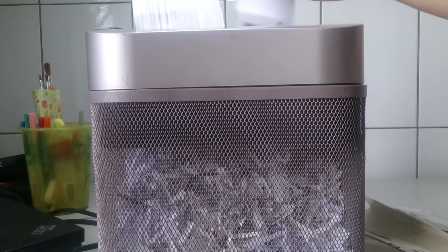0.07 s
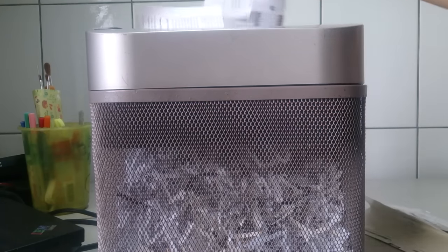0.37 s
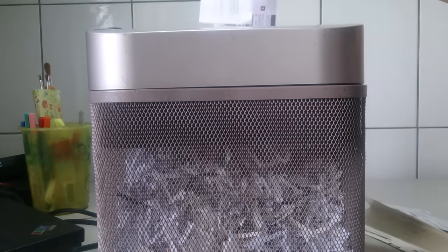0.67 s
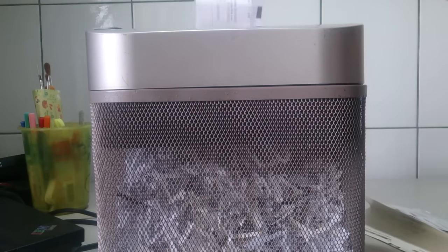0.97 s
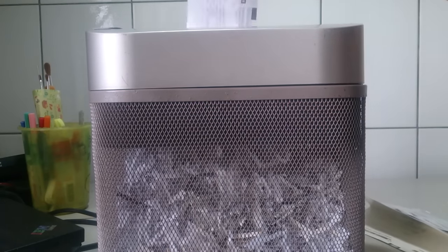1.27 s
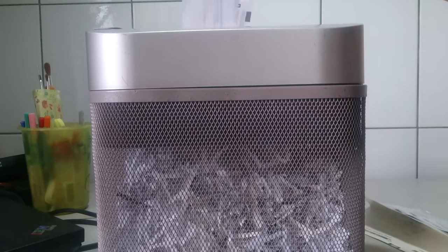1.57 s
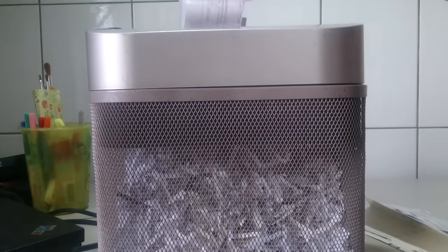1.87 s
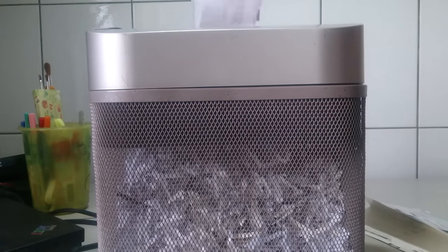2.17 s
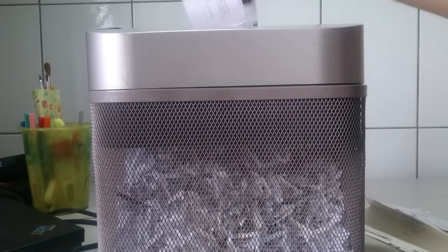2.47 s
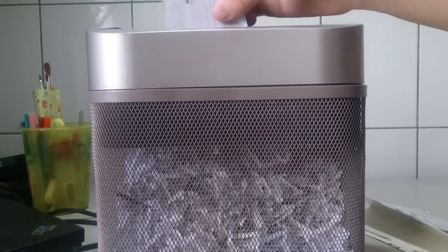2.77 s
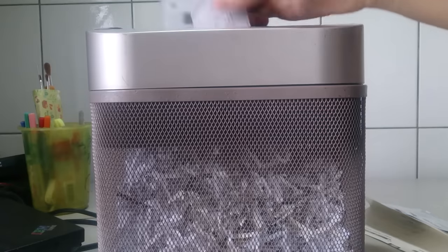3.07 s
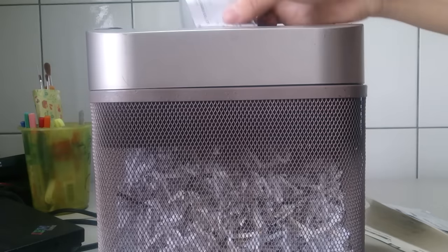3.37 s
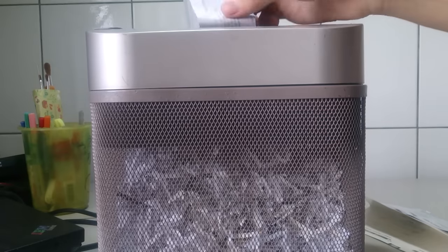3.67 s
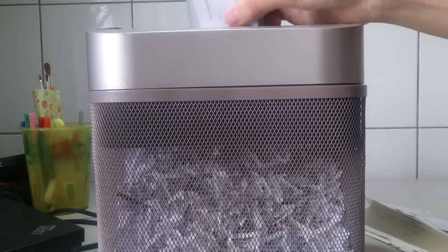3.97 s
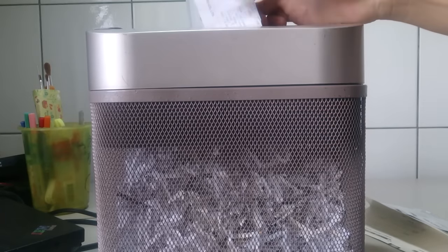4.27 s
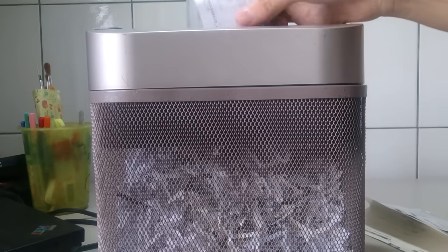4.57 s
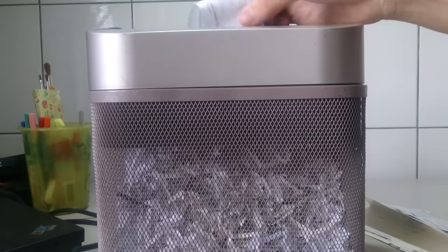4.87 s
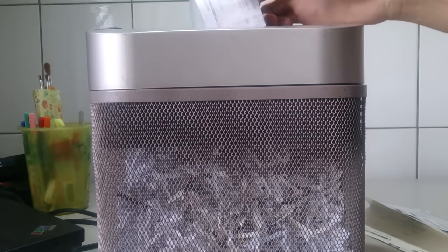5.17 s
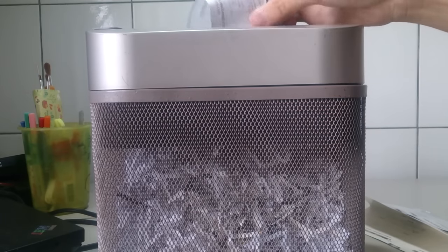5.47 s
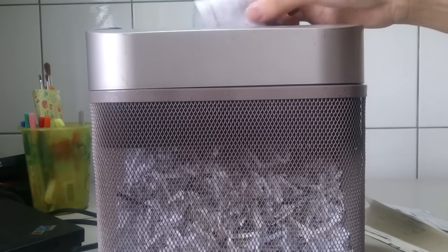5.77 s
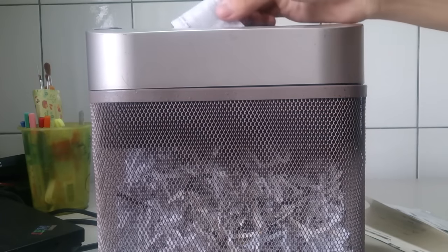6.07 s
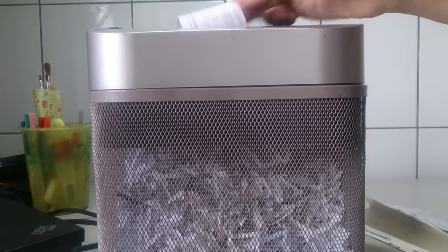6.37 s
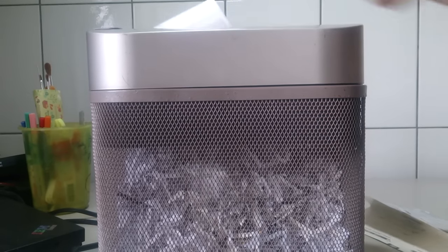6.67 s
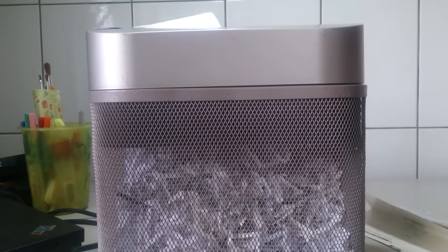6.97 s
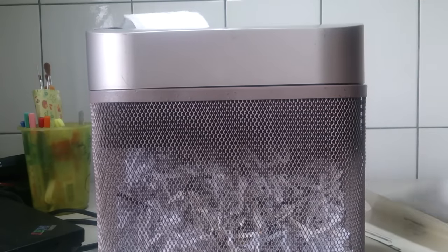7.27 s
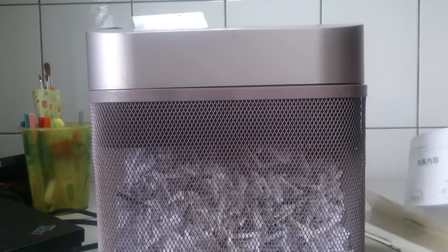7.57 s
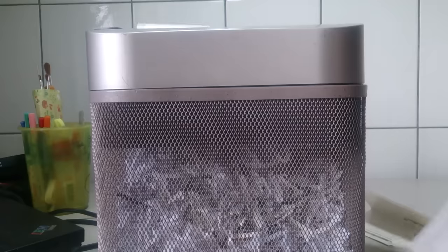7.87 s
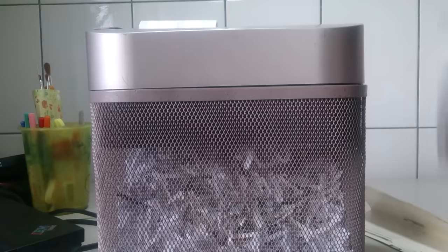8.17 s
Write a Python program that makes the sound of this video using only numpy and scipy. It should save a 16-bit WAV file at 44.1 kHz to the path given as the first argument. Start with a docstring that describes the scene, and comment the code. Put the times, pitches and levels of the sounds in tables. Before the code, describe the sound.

Close up in a tiled corner, paper tears and crackles loudly in a desktop shredder, the motor's whir sagging under the load. The machine coasts to a halt, leaving about four seconds of soft paper sliding, dry crinkles and light knocks on the plastic lid. Then it clicks on, spins up quickly and grinds through the paper again, with brief, very high squeals near the end.

```python
"""Paper crunches and snaps in the steel cutters of a small shredder, on a desk in a tiled corner.
Its gears whine and chatter in the plastic head, sagging in speed under load, over a mains hum.
The motor coasts to a stop; in the pause a hand works the sheet, which rustles and knocks in the slot.
Then the switch clicks, the gears jolt to life and the cutting goes on, with a few high squeaks."""
import sys
import numpy as np
from scipy import signal
from scipy.fft import rfft, irfft
from scipy.io import wavfile
from scipy.ndimage import uniform_filter1d

SR = 44100
rng = np.random.default_rng(int(sys.argv[2]) if len(sys.argv) > 2 else 0)


def wrap_up_sound(samples):
    """Save the sound to the file named by the first command line argument, as 16-bit audio."""
    columns = np.atleast_2d(samples).T
    # keep every value between -1 and 1, then stretch to whole-number steps
    tamed = np.clip(columns, -1, 1)
    steps = np.round(tamed * 32767).astype(np.int16)
    wavfile.write(sys.argv[1], SR, steps)


N = 362061
TIME = np.arange(N) / SR
POWER_OFF_S, POWER_ON_S = 2.26, 6.27  # the motor is unpowered between these

# modes of the plastic head: f/Hz, width/Hz, level/dB
HEAD_MODES = [(218, 65, -17.5), (397, 17, 0.5), (456.6, 12.2, 3.5), (546, 22, -9.5), (681, 27, -7),
              (927, 93, -0.5), (1156, 330, -12.5), (1690, 43, -7), (1940, 400, -13.5), (2960, 2600, -22.5)]
# rings of the slot and mesh basket: f/Hz, width/Hz, level/dB
SLOT_MODES = [(6105, 50, 16), (11420, 50, 14.5)]
# tone of dry, handled paper: f/Hz, level/dB
PAPER_EQ = [(100, 1.5), (500, 3), (2000, -4), (4000, 3.5), (7000, 1), (9000, 2.5), (12000, -0.5),
            (15500, -2.5)]


def cutting(speed):
    """Fibres tear in quick crunches that follow the cutters' speed, with a loud snap now and then."""
    # sharp snaps: paper between the cutters, and the switch clicking on at 6.27 s: t/s, level/dB
    snap_hits = [(0.021, -7.5), (0.271, -5.5), (0.39, -14), (0.419, -9.5), (0.536, -5), (0.634, -7.5),
                 (0.741, -9), (0.774, -6), (0.855, -8), (0.999, -8), (1.015, -7.5), (1.091, -11.5),
                 (1.158, -11), (1.565, -3.5), (1.593, -6.5), (1.733, -11.5), (2.01, -7.5), (2.236, -10),
                 (6.2706, -20), (6.459, -9), (6.669, -16), (6.803, -8), (6.831, -7), (6.941, -16),
                 (8.081, -7)]
    # tone of the tearing: f/Hz, level/dB
    tear_eq = [(100, -16), (400, 13.5), (1200, 3.5), (2500, 1), (4000, -1), (7000, -2.5), (8300, -1),
               (10000, -2.5), (13300, -4), (15500, -9)]
    # rings of the steel cutters: f/Hz, width/Hz, level/dB
    cutter_modes = [(3670, 47, -2), (9040, 42, -30), (13700, 200, -8)]
    bite = undb(-29.5 + 1.2 * walk(33)) * (speed / speed.max()) ** 1.32
    crunch = unit(clicks(4000, spread_db=3.5) * undb(1.22 * walk(180)))
    pops = undb(-10) * clicks(70, spread_db=3.5)
    tearing = room(undb(2) * bite * crunch, wet_db=15.5, t60_s=0.014, pan_db=3.5)
    tearing += room(bite * pops, wet_db=6, t60_s=0.012, pan_db=7)
    times, levels_db = np.transpose(snap_hits)
    snaps = room(bursts(times, levels_db - 8, decay_s=0.0023), wet_db=-2, t60_s=0.021, pan_db=8)
    tearing += highpass(snaps, hz=1510, order=1)  # thin and bright
    return tiles(colour(tearing, tear_eq) + ring(tearing, cutter_modes), echo_db=-6.5)


def wheel_speed():
    """Gear wheel turns per second: sagging under load, braked by friction, spinning up again."""
    # powered speed as the paper loads the wheel: t/s, speed/(turns per s)
    loaded_speed = [(.1, 24.4), (.33, 25.05), (.5, 23.3), (.65, 23.0), (.9, 23.05), (1.05, 24.3),
                    (1.22, 24.8), (1.42, 23.1), (1.6, 24.8), (1.76, 25.8), (2.26, 25.55), (6.72, 24.85),
                    (6.93, 24.0), (7.1, 24.45), (7.35, 24.15), (7.5, 24.5), (7.8, 23.3), (7.95, 23.9),
                    (8.21, 23)]
    coast_s, spin_up_s = .457, .104
    coast = np.clip(1 - (TIME - POWER_OFF_S) / coast_s, 0, 1) ** 1.3
    spin_up = 1 - np.exp(-np.maximum(TIME - POWER_ON_S, 0) / spin_up_s)
    return np.interp(TIME, *np.transpose(loaded_speed)) * (coast + spin_up)


def drive(speed):
    """Gear tones and tooth chatter shake the head; the off-centre wheel makes both throb once a turn."""
    # the bin booms when the rotor's second harmonic meets it: f/Hz, width/Hz, level/dB
    bin_mode = [(257, 14, -14.5)]
    high_spot_turns = np.where(TIME < POWER_ON_S, .27, -.06)
    turns = high_spot_turns + np.cumsum(speed * (1 + 0.0015 * walk(23.4))) / SR
    wobble = np.cos(2 * np.pi * turns)
    pace = speed / speed.max()
    free = np.clip(speed - 24.8, 0, 1)  # 1 when the cutters run nearly unloaded
    # strain rises while the rotor speeds up or brakes
    strain = np.minimum(uniform_filter1d(np.abs(np.gradient(speed)) * SR, size=2000) / 35, 1)
    starting = strain * (TIME > POWER_ON_S)
    gears = gear_tones(turns, pace, free, strain, starting)
    whine = pinion_whine(turns, speed, free, strain, starting)
    tooth_force = undb(2.3 * wobble + 2 * walk(25) - 2 * strain - starting - .7 * free) * pace ** 0.4
    teeth = clicks(45 * speed, spread_db=3.5) * tooth_force
    chatter = room(teeth, wet_db=2, t60_s=0.16, pan_db=-1.5)
    throb = undb(3.3 * (1 - free) * wobble)
    body = ring(undb(-6.5) * gears * throb + undb(14) * chatter, HEAD_MODES)
    leak = undb(-16) * gears  # straight out through the slot
    boom = ring(np.sin(2 * np.pi * 10 * turns), bin_mode)
    return (body + leak + whine + boom) * drive_gain()


def gear_tones(turns, pace, free, strain, starting):
    """The big wheel sings loudest under load; speed changes bring its main tone forward."""
    # tones of the big wheel: f/wheel speed, level/dB
    wheel_orders = [(35, -6), (36, -3), (37, -14), (39, 0), (40, 5), (41, -10), (43, -8), (50, -3)]
    main_tone = (strain - .4 * starting) * mesh(turns, [(40, 3)], slip=.2)
    chord = mesh(turns, wheel_orders, slip=.3 + .2 * free) * undb(-5 * strain)
    return ports(chord + main_tone, pan_db=2) * pace ** 2 * undb(-5 * free)


def pinion_whine(turns, speed, free, strain, starting):
    """The fast pinion judders under strain; from rest it rattles loosely and sings once seated."""
    # tones of the pinion: f/wheel speed, level/dB
    pinion_orders = [(77, -8), (79, -5), (80, 5), (120, -8), (160, -6)]
    # gearbox frame modes that the whine sweeps through: f/Hz, width/Hz, level/dB
    frame_modes = [(925, 60, 12.5), (1565, 100, 6), (1765, 65, 2), (1990, 190, -1.5)]
    seated_speed = 18  # turns per second
    loose = starting * np.clip((seated_speed - speed) / 3, 0, 1)
    pressure = undb((2.2 + 1.5 * strain) * walk(70) - 6.5 * loose + 2.5 * free)
    tones = mesh(turns, pinion_orders, slip=.5 + .35 * (.7 * strain + loose - .5 * free))
    pinion = ports(tones, pan_db=3) * (speed / speed.max()) ** 1.3 * pressure
    return undb(-9) * ring(pinion, frame_modes) + undb(-22 + 4 * strain) * pinion


def mesh(turns, orders, slip):
    """Meshing teeth: tones locked to the wheel, shaken together by `slip` radians of gear play."""
    play = slip * walk(110)
    tones = sum(undb(db + 0.72 * walk(5)) * np.cos(2 * np.pi * order * turns + play)
                for order, db in orders)
    return tones * undb(.9 * walk(10))


def drive_gain():
    """Nearly even level: slack gears rattle a touch more when coasting and jolt as power returns."""
    slack = np.clip((TIME - POWER_OFF_S) / 0.48, 0, 1) * (TIME < POWER_ON_S)
    jolt = swell(POWER_ON_S + .022, length_s=.05)
    return undb(-27 + 0.5 * walk(40) + 0.5 * slack + 14 * jolt)


def growl():
    """Now and then the head shudders near one of its two strongest modes."""
    # surges of the growl: middle/s, length/s, level/dB, f/Hz
    surges = [(0.19, 0.098, -31.5, 403.6), (0.415, 0.076, -31, 444), (0.628, 0.18, -29.5, 449),
              (0.836, 0.12, -29, 447.6), (1.558, 0.025, -25.5, 434), (2.028, 0.059, -26.5, 447),
              (2.225, 0.088, -28, 448), (6.64, 0.048, -23, 444), (6.795, 0.066, -30.5, 397.5),
              (7.273, 0.068, -27.5, 451)]
    judder, slip = undb(2 * walk(50)), 0.85 * walk(48)
    tones = sum(undb(db) * swell(middle, length) * np.sin(2 * np.pi * hz * TIME + slip)
                for middle, length, db, hz in surges)
    return ports(tones * judder, pan_db=-3.5)


def squeaks():
    """The sheet rubs on the blades in short, rough, very high squeals."""
    # rubs on the blades: middle/s, length/s, f/Hz, level/dB
    rubs = [(7.375, 0.037, 11260, -38.5), (7.49, .06, 13400, -38), (7.578, .05, 14150, -35),
            (7.658, .05, 13800, -36)]
    width_hz = 350
    squeal = np.zeros(N)
    for middle, length, hz, db in rubs:
        band = [(hz, width_hz, 0)]
        narrow_noise = unit(ring(ring(rng.standard_normal(N), band), band))
        squeal += undb(db) * swell(middle, length) * narrow_noise
    return tiles(ports(squeal, pan_db=4), echo_db=-13)


def rustle(running):
    """The sheet slides with a grainy hiss and crinkles in dry ticks, ringing itself and the slot."""
    # the hand slides the sheet: middle/s, length/s, level/dB
    strokes = [(2.683, 0.25, -46.5), (2.998, 0.21, -45), (3.187, 0.12, -48), (3.332, 0.076, -46),
               (3.441, 0.12, -46.5), (3.61, 0.095, -53), (3.733, 0.06, -47.5), (4.074, 0.12, -53),
               (4.2, 0.14, -49), (4.374, 0.13, -43), (4.503, 0.046, -48.5), (4.57, 0.16, -43.5),
               (4.792, 0.14, -43), (4.95, 0.085, -45), (5.026, 0.068, -41), (5.088, 0.077, -49.5),
               (5.198, 0.059, -51.5), (5.285, 0.063, -46), (5.425, 0.17, -46), (5.691, 0.12, -44.5),
               (5.877, 0.037, -46.5), (5.919, 0.03, -37.5), (6.02, 0.14, -45), (6.146, 0.094, -46)]
    # creases flip with a sharp crackle: t/s, level/dB
    creases = [(3.3139, -44), (3.349, -31), (3.589, -40), (4.2548, -35), (4.267, -31.5), (4.323, -33),
               (4.362, -30), (4.372, -32), (4.395, -34), (4.544, -25), (4.568, -27.5), (4.671, -39),
               (4.799, -33), (4.904, -35), (4.951, -28), (4.968, -23), (4.999, -27), (5.02, -28),
               (5.292, -30), (5.3687, -40), (5.578, -37), (5.856, -37), (6.064, -36), (6.126, -33)]
    # resonances of the bent sheet in the slot: f/Hz, width/Hz, level/dB
    sheet_modes = [(1710, 280, -1), (3400, 250, -3), (3870, 300, -4), (4630, 400, -4), (6360, 300, -3),
                   (8300, 500, -3)]
    held = undb(-83) * (1 - running)
    motion = held + sum(undb(db) * swell(middle, length) for middle, length, db in strokes)
    slide = undb(-5) * motion * unit(clicks(4000, spread_db=0.5) * undb(3.1 * walk(79)))
    crinkle = undb(-14) * motion * clicks(160, spread_db=3)
    times, levels_db = np.transpose(creases)
    crackle = bursts(times, levels_db - 6.5, decay_s=0.0019)
    ticks = room(crinkle + crackle, wet_db=-3, t60_s=0.025, pan_db=5)
    grains = room(slide, wet_db=-0.5, t60_s=0.03, pan_db=3) + ticks
    rings = undb(1) * ring(grains, sheet_modes) + undb(-17) * ring(grains, SLOT_MODES)
    return tiles(colour(grains, PAPER_EQ), echo_db=-11) + tiles(rings, echo_db=3)


def knocks():
    """Each knock cracks, thuds in the head and pings the slot."""
    # slack gears stopping, then hand and sheet, then the switch: t/s, crack/dB, thud/dB, ping/dB
    hits = [(2.544, -50, -50, -44), (2.577, -50, -42, -44), (3.015, -26, -59, -28),
            (3.038, -29, -40.5, -21), (3.082, -55, -50, -44), (3.138, -37, -43.5, -36),
            (3.2444, -39, -53.5, -40), (3.955, -56, -61, -46), (4.052, -54, -66, -42),
            (4.233, -54, -54, -44), (4.2897, -25.5, -41.5, -17), (4.719, -29, -42.5, -10),
            (5.022, -37, -49, -16), (5.999, -42, -51.5, -36), (6.2725, -25, -47, -26)]
    # tone of the dull thud: f/Hz, level/dB
    thud_eq = [(100, -51), (300, 9), (600, 15.5), (900, 8.5), (1300, 5), (2500, -6.5), (8000, -27)]
    times, crack_db, thud_db, ping_db = np.transpose(hits)
    crack = room(bursts(times, crack_db - 8.5, decay_s=0.0045), wet_db=29, t60_s=0.067, pan_db=6)
    blow = room(bursts(times, thud_db + 20, decay_s=0.0083), wet_db=-1.5, t60_s=0.21, pan_db=2)
    thud = undb(6) * ring(blow, HEAD_MODES) + undb(-13.5) * colour(blow, thud_eq)
    contacts = np.zeros(N)
    contacts[(times * SR).astype(int)] = undb(ping_db)
    ping = ring(contacts, SLOT_MODES) * undb([[2], [-2]])  # leans left
    return colour(crack, PAPER_EQ) + thud + ping


def lid_taps():
    """Light taps ring only the lid."""
    # taps: t/s, level/dB
    taps = [(2.757, -33), (3.347, -24), (3.448, -34), (5.944, -27), (6.2, -27.5)]
    # modes of the lid: f/Hz, width/Hz, level/dB
    lid_modes = [(1370, 760, 3.5), (1810, 240, 0), (3900, 1300, -10)]
    touches = bursts(*np.transpose(taps), decay_s=0.0019)
    return ring(room(touches, wet_db=2, t60_s=0.16, pan_db=1), lid_modes)


def desk_hum(speed):
    """Mains hum and low shudder through the desk; a slowed, powered motor draws more current."""
    powered = uniform_filter1d(1. * ((TIME < POWER_OFF_S) | (TIME > POWER_ON_S)), size=2000)
    load = undb(-3.5 * np.maximum(speed - 24.3, 0))
    waver = np.clip(1 + .4 * walk(13), .1, 1.5)
    mains = waver * np.sin(2 * np.pi * 119.5 * TIME + .7 * walk(10))
    shake = undb(-56 + 1.4 * walk(2.6)) * np.sin(2 * np.pi * 2 * np.cumsum(speed) / SR)  # twice a turn
    shudder_eq = [(20, -21), (55, -4), (80, -20), (130, -8), (200, -24), (400, -22)]  # f/Hz, level/dB
    shudder = undb(-43.5) * unit(colour(rng.standard_normal(N), shudder_eq))
    idle_hum = undb(-66) * mains
    return (undb(-50) * mains + shake + shudder) * powered * load + idle_hum


def room_tone():
    """Quiet rumble, nearly the same on both sides, under faint wide hiss."""
    # tone of the rumble: f/Hz, level/dB
    rumble_eq = [(20, 1), (50, 1), (85, -5), (120, -6), (170, -11.5), (430, -11.5), (1000, -24.5),
                 (3000, -56), (15000, -67)]
    # tone of the hiss: f/Hz, level/dB
    hiss_eq = [(300, -1), (1500, -2), (6000, -5), (11000, -8.5), (15000, -6.5)]
    air = rng.standard_normal(N) + undb(-10.5) * rng.standard_normal((2, N))
    rumble = unit(colour(air, rumble_eq)) * undb(-57 + 0.41 * walk(14))
    hiss = undb(-59.5) * unit(colour(rng.standard_normal((2, N)), hiss_eq))
    return rumble + hiss


def room(x, wet_db, t60_s, pan_db):
    """The tiles smear every click into a short diffuse tail, alike on both sides in the bass."""
    feedback = np.exp(-2 * np.log(1000) / (t60_s * SR))
    tail = np.sqrt(signal.lfilter([1 - feedback], [1, -feedback], x ** 2 + 1e-18))
    mid, side = tail * rng.standard_normal((2, N))
    side = highpass(side, hz=780, order=4)
    diffuse = np.array([mid + side, mid - side]) * undb([[pan_db / 2], [-pan_db / 2]]) / np.sqrt(2)
    return (ports(x, pan_db) + undb(wet_db) * diffuse) / np.sqrt(1 + undb(2 * wet_db))


def tiles(x, echo_db):
    """Near walls and the desk return a few early echoes, different on each side."""
    response = np.zeros((2, SR // 60))
    for side in response:
        side[rng.integers(SR // 1000, len(side), size=16)] = rng.choice([-1, 1], size=16) / np.sqrt(16)
    echoes = signal.oaconvolve(x, response, axes=1)[:, :N]
    return (x + undb(echo_db) * echoes) / np.sqrt(1 + undb(2 * echo_db))


def ports(x, pan_db):
    """Direct sound reaches the left microphone port 0.1 ms early; positive pan leans left."""
    return np.array([x * undb(pan_db / 2), np.roll(x, 4) * undb(-pan_db / 2)])


def clicks(per_s, spread_db):
    """Random clicks of either sign and varying size, at rms 1."""
    size = undb(spread_db * np.minimum(rng.standard_normal(N), 2.5))
    return unit((rng.random(N) < per_s / SR) * size * rng.choice([-1, 1], N))


def bursts(times, levels_db, decay_s):
    """Short noise bursts: sudden attack, exponential decay."""
    envelope = np.zeros(N)
    for start, db in zip(times, levels_db):
        i = int(start * SR)
        age = TIME[:min(N - i, SR // 4)]
        envelope[i:i + len(age)] += undb(db) * np.exp(-age / decay_s)
    return envelope * rng.standard_normal(N)


def swell(middle_s, length_s):
    """A smooth rise and fall, 9 dB down at the two ends of its length."""
    return np.exp(-(2 * (TIME - middle_s) / length_s) ** 2)


def walk(rate):
    """Smooth random drift at rms 1, changing about `rate` times a second."""
    size = max(int(SR / rate), 2)
    smoothed = uniform_filter1d(rng.standard_normal(N), size, mode="wrap")
    return unit(uniform_filter1d(smoothed, size, mode="wrap"))


def ring(x, modes):
    """Parallel resonances (f/Hz, width/Hz, level/dB) of alternating polarity."""
    return sum((-1) ** k * undb(db) * signal.lfilter(*signal.iirpeak(hz, hz / width, SR), x)
               for k, (hz, width, db) in enumerate(modes))


def colour(x, points):
    """Minimum-phase EQ through (f/Hz, level/dB) points."""
    hz, db = np.transpose(points)
    size = 4096
    bin_hz = np.arange(size // 2 + 1) * SR / size
    gain = undb(np.interp(np.log(bin_hz + 1), np.log(hz), db))
    cepstrum = irfft(np.log(gain))
    cepstrum[1:size // 2] *= 2  # folding the cepstrum makes the filter causal
    cepstrum[size // 2 + 1:] = 0
    impulse = irfft(np.exp(rfft(cepstrum)))
    return signal.oaconvolve(np.atleast_2d(x), impulse[None], axes=1)[:, :N]


def highpass(x, hz, order):
    """Roll off the lows."""
    return signal.sosfilt(signal.butter(order, hz, "high", fs=SR, output="sos"), x)


def undb(db):
    """Decibels to gain."""
    return 10 ** (np.asarray(db) / 20)


def unit(x):
    """Scale to rms 1."""
    return x / np.sqrt(np.mean(x ** 2) + 1e-20)


def scene():
    """Cutters and gears sound while the wheel turns; in the pause the hand works the sheet."""
    speed = wheel_speed()
    # the drive fades out as it coasts, but bites at once when the power returns
    running = np.maximum(np.clip(speed / 5, 0, 1), TIME > POWER_ON_S)
    shredding = cutting(speed) + drive(speed) * running + growl() + squeaks()
    handling = rustle(running) + knocks() + lid_taps()
    return shredding + handling + desk_hum(speed) + room_tone()


def record(dry):
    """Each microphone port lifts its own part of the treble; the top is cut steeply."""
    # port resonances, left then right: f/Hz, width/Hz, level/dB
    port_modes = [(10760, 1030, 11), (12700, 1100, 6)]
    top_hz = 15800
    heard = np.array([x + ring(x, [mode]) for x, mode in zip(dry, port_modes)])
    return signal.sosfilt(signal.ellip(10, .2, 70, top_hz, fs=SR, output="sos"), heard)


dry = scene()
out = record(dry)
wrap_up_sound(out)
```